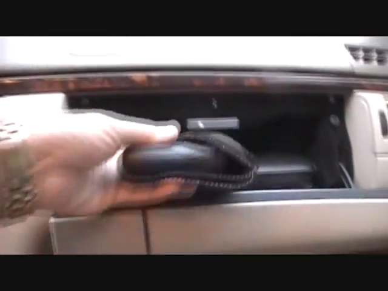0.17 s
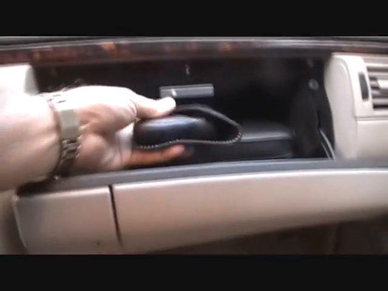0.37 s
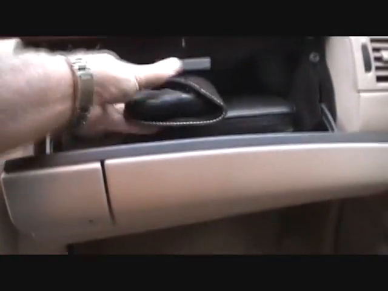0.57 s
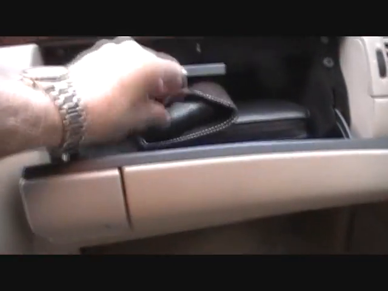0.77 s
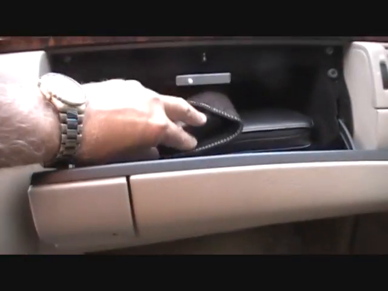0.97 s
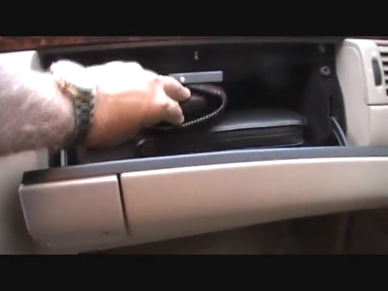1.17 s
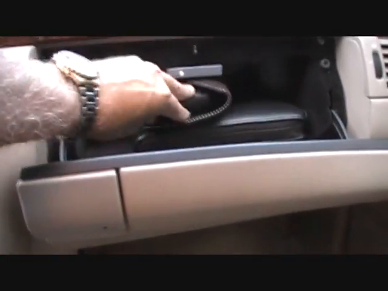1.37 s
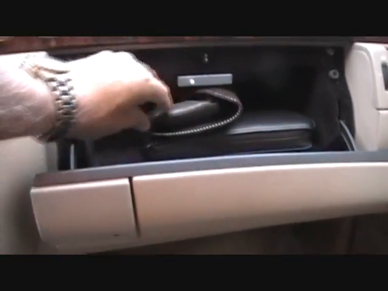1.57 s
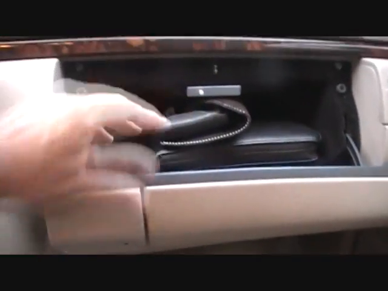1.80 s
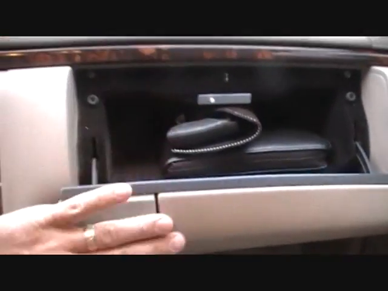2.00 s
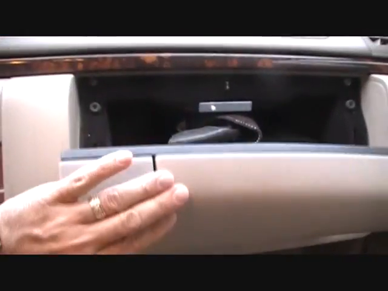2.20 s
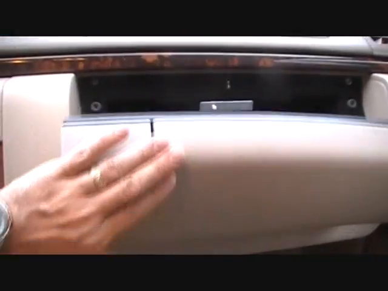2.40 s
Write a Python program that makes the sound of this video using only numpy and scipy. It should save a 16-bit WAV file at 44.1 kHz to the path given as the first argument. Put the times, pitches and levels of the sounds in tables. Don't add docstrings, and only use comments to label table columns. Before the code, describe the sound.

Close, bright, slightly hissy microphone in a padded car cabin: quick knocks and a harsh scrape as a pouch goes into the glove box, gentle shuffling, faint watch ticks, then the plastic lid clatters on its hinge.

```python
import sys
import numpy as np
from scipy import signal
from scipy.fft import rfft, irfft
from scipy.io import wavfile

SR = 44100
rng = np.random.default_rng(int(sys.argv[2]) if len(sys.argv) > 2 else 0)


def persist_wave(psi):
    counts = np.round(np.clip(psi, -1, 1) * 32767).astype(np.int16)
    wavfile.write(sys.argv[1], SR, np.atleast_2d(counts).T)


def rack_gain(trim_db):
    fader = np.asarray(trim_db, float)
    return 10 ** (fader / 20)


N = 108045
TAIL = 6000


def rms_one(x):
    return x / np.sqrt(np.mean(x ** 2) + 1e-20)


def peak_one(x):
    return x / np.abs(x).max()


def band(x, low_hz, high_hz):
    edges = [low_hz, min(high_hz, .45 * SR)]
    return signal.sosfilt(signal.butter(2, edges, "band", fs=SR, output="sos"), x)


def ring(x, hz, t60):
    radius, angle = rack_gain(-60 / (t60 * SR)), 2 * np.pi * hz / SR
    return signal.lfilter([0, np.sin(angle)], [1, -2 * radius * np.cos(angle), radius * radius], x + 1e-18)


def coloured(x, spectrum):
    hz, db = np.transpose(spectrum)
    f = np.fft.rfftfreq(len(x), 1 / SR) + 1
    gain = rack_gain(np.interp(np.log(f), np.log(hz), db))
    return rms_one(irfft(rfft(x) * gain, len(x)))


def add(out, s, sound):
    i = int(s * SR)
    out[i:i + len(sound)] += sound[:len(out) - i]


def contact(chatter_db=0):
    t = np.arange(TAIL) / SR
    cabin = rack_gain(-15 - 60 * t / 0.073)
    near = rack_gain(-14 + chatter_db - 60 * t / 0.021)
    onset = np.clip(t / 0.00096, 0, 1) ** 2
    x = (cabin + near) * rng.standard_normal(TAIL) * onset / 2
    x[2] += 1
    return x


# f/Hz, level/dB, t60/s
BOX_MODES = [(228, -4.5, 0.034), (387, -12, 0.16), (545.5, -5, 0.077), (624, -1.5, 0.047),
             (770, -5.5, 0.075), (880, 1, 0.056), (946, 8.5, 0.013), (1174, -2, 0.035), (1230, -5, 0.069),
             (1410, 1.5, 0.016), (1660, -2.5, 0.045), (1984, 5.5, 0.0077)]


def hollow_box(x, spread_db, t60_scale=1):
    out, sign = 0, 1
    for hz, db, t60 in BOX_MODES:
        strength = rack_gain(db + spread_db * rng.normal())
        out = out + sign * strength * ring(x, hz, t60 * t60_scale)
        sign = -sign
    return out


# t/s, length/s, hiss level at start/dB, at end/dB, box rumble over hiss/dB
SLIDING_STROKES = [(-.02, 0.13, -51, -65.5, -6), (0.08, 0.048, -58, -55.5, -5),
                   (0.239, 0.034, -29.5, -30.5, 3), (0.261, 0.058, -41.5, -49, 10),
                   (0.403, 0.18, -38, -41.5, -8), (0.595, 0.13, -45, -43.5, -6.5),
                   (0.778, 0.092, -57.5, -59, 4), (0.948, 0.16, -58, -67, -1), (.986, .014, -50, -52, -4),
                   (1.071, 0.071, -50.5, -39.5, -13.5), (1.139, 0.068, -40, -38.5, -14.5),
                   (1.194, 0.03, -52, -60, 12), (1.23, 0.057, -60.5, -53.5, 0.5),
                   (1.31, 0.04, -50.5, -54, -4), (1.432, 0.041, -51.5, -60.5, 0.5),
                   (1.896, 0.013, -52, -51.5, -7.5), (0.326, 0.038, -59, -61, 0),
                   (0.454, 0.09, -47.5, -44.5, -2.5), (0.534, 0.051, -52, -53.5, 8),
                   (2.064, 0.021, -39, -46.5, 6.5), (2.086, 0.091, -55.5, -45, 2.5),
                   (2.204, 0.097, -57.5, -64.5, -0.5), (2.386, .09, -64, -60, -2)]
# f/Hz, level/dB per Hz
FRICTION_SPECTRUM = [(700, -43), (1300, -11.5), (6500, -7), (8500, 0.5), (10300, 5.5), (12500, -0.5),
                     (15000, -9), (16500, -34)]


def pouch_slides():
    attack_s, release_t60_s = .016, 0.096
    grains_per_s, grain_spread_db = 24000, 2.0
    t = np.arange(N) / SR
    hiss_power, rumble_power = np.zeros(N), np.zeros(N)
    for s, length, start_db, end_db, box_db in SLIDING_STROKES:
        level = np.interp(t, [s, s + length], [start_db, end_db])
        level = level - 60 * np.clip(t - s - length, 0, 1) / release_t60_s
        gain = rack_gain(level) * np.clip((t - s) / attack_s, 0, 1)
        hiss_power += gain ** 2
        rumble_power += (gain * rack_gain(box_db)) ** 2

    present = rng.random((2, N)) < grains_per_s / SR
    height = rack_gain(grain_spread_db * rng.exponential(1, (2, N)))
    grains = present * height * rng.choice([-1, 1], (2, N))
    judder = rms_one(band(rng.standard_normal(N), 12, 60))

    hiss = coloured(grains[0], FRICTION_SPECTRUM)
    rumble = band(rms_one(hollow_box(grains[1], spread_db=0, t60_scale=.5)), 400, 6600)
    scrape = rack_gain(-7.5) * rms_one(band(grains[1], 830, 5000))
    hiss = rack_gain(1.0 * judder) * np.sqrt(hiss_power) * hiss
    return hiss + rack_gain(1.6 * judder) * np.sqrt(rumble_power) * (rumble + scrape)


def knocks(rows, chatter_db):
    out = np.zeros(N)
    for s, db, hz, ring_db, snap_db in rows:
        x = contact(chatter_db)
        panel = band(ring(x, hz, .022), .5 * hz, 2.6 * hz)
        box = band(hollow_box(x, spread_db=2.5), .5 * hz, 1.7 * hz)
        low = peak_one(panel) + 2 * rack_gain(-8) * peak_one(box)
        crack = band(band(x, 1400, 6500), 700, 11000)
        snap = band(x, 7600, 13600)
        high = peak_one(crack) + rack_gain(snap_db) * peak_one(snap)
        add(out, s, rack_gain(db) * (rack_gain(2.5 + ring_db) * low + rack_gain(-1) * high))
    return out


# t/s, crack peak level/dB, main ring f/Hz, ring over crack/dB, snap over crack/dB
POUCH_IMPACTS = [(0.0966, -29, 1680, -22, -2), (0.129, -25.5, 810, -32, -3), (0.1454, -28, 930, -29, -10),
                 (0.2414, -22.5, 1350, -3, 4), (0.2473, -19, 950, -12.5, -8), (0.2554, -24, 1626, -10, -9),
                 (0.2716, -16, 780, -14.5, -17), (0.2874, -26, 580, -3, 9), (0.3334, -37, 640, 11.5, 7),
                 (0.413, -21.5, 1230, -16, -7), (0.4804, -41, 900, 4, 1), (0.5644, -44, 580, 3.5, -2),
                 (0.5953, -19.5, 1404, -12.5, 0.5), (0.7095, -22, 945, -32, -18),
                 (0.7914, -47, 1320, -4, -5), (0.8714, -48, 624, 7, -17), (0.9174, -51, 760, 1.5, -3),
                 (0.9906, -44, 603, -22, 5.5), (1.267, -35, 1370, -19, -4), (1.4466, -50, 880, -14, -1)]


def pouch_knocks():
    return knocks(POUCH_IMPACTS, chatter_db=-4.5)


# t/s, crack peak level/dB, main ring f/Hz, ring over crack/dB, snap over crack/dB
LID_IMPACTS = [(1.6836, -22.5, 1806, -12, 4.5), (1.6874, -23.5, 910, -20.5, -41),
               (2.0444, -56, 1240, -18, 24), (2.0552, -27, 1204, -10, 4.5), (2.0757, -37, 1310, -3, -8),
               (2.0784, -33, 900, -6, -10), (2.0991, -18, 1155, -17, -39), (2.1034, -19, 700, -14, 5),
               (2.1134, -30.5, 1115, -1, -16), (2.1184, -43, 1180, -9, 18), (2.1524, -34, 1360, -18, -10),
               (2.1625, -21.5, 1740, -11.5, -1), (2.1684, -28.5, 642, -6, -8),
               (2.2238, -46.5, 595, -3.5, -12), (2.3037, -29.5, 680, -17.5, -1),
               (2.365, -24, 1266, -13, -2), (2.3684, -39, 860, -6, -10)]


def lid_knocks():
    return band(knocks(LID_IMPACTS, chatter_db=4), 20, 11500)


def panels(rows, attack_s, sag_hz, roughness):
    out, t = np.zeros(N), np.arange(2 * TAIL) / SR
    for s, db, hz, t60 in rows:
        fall = rack_gain(-60 * t / t60)
        phase = 2 * np.pi * np.cumsum(hz + sag_hz * fall) / SR
        add(out, s, rack_gain(db) * fall * np.clip(t / attack_s, 0, 1) * np.sin(phase))
    flutter = rms_one(band(rng.standard_normal(N), 50, 300))
    return out * (1 + roughness * flutter)


# t/s, peak level/dB, f/Hz, t60/s
PANEL_MODES = [(.0968, -41, 1870, 0.05), (.0968, -43, 2450, 0.052), (0.12, -46, 870, 0.036),
               (.1295, -38, 2030, .03), (.133, -36.5, 850, 0.059), (.248, -22.5, 870, 0.058),
               (.2715, -23.5, 790, 0.047), (.271, -19, 1640, 0.025), (.276, -28, 550, 0.065),
               (.2985, -22.5, 810, 0.056), (.2983, -18, 622, .1), (.255, -26, 420, .06),
               (.262, -30, 3000, .04), (.962, -50, 3000, 0.038), (.335, -24.5, 624, 0.059),
               (.334, -27, 900, 0.068), (.415, -30.5, 1260, 0.066), (.414, -33, 3130, 0.038),
               (.414, -37, 600, 0.058), (.481, -30, 586, 0.071), (.572, -36, 610, .05),
               (.598, -33, 1400, .06), (.752, -48, 630, 0.056), (.87, -39, 564, 0.047),
               (.917, -51, 800, 0.048), (1.685, -36, 904, 0.071), (1.686, -41.5, 714, 0.076),
               (1.685, -36.5, 1070, 0.048), (1.684, -42, 3300, .04), (1.684, -40, 2200, 0.046),
               (2.047, -41, 1230, 0.048), (2.074, -27, 1350, 0.033), (2.078, -32.5, 774, 0.043),
               (2.099, -29.5, 2250, .04), (2.101, -35, 590, 0.045), (2.114, -27, 2270, 0.027),
               (2.132, -38, 640, 0.065), (2.163, -29, 2200, 0.041), (2.165, -27.5, 650, 0.04),
               (2.305, -35.5, 2000, 0.029), (2.304, -41.5, 630, 0.085), (2.304, -37, 1150, 0.036),
               (2.3665, -28.5, 790, 0.026), (2.366, -34, 2620, .035), (2.376, -53, 950, 0.042)]


def panel_rings():
    return panels(PANEL_MODES, attack_s=0.0016, sag_hz=3.2, roughness=.3)


# t/s, peak level/dB, f/Hz, t60/s
SOFT_DROPS = [(1.2086, -26, 220, .095), (1.211, -43, 730, .06), (1.21, -43, 1250, .05),
              (.334, -41, 113, 0.084), (.484, -46, 170, 0.055), (1.688, -44, 390, 0.064),
              (2.1, -42, 199, .09), (2.366, -47.5, 303, 0.054), (1.18, -44, 920, .09),
              (1.223, -33.5, 176, 0.077), (1.212, -41, 525, 0.061), (.262, -34, 128, .15),
              (.245, -33, 215, 0.14), (.335, -28.5, 370, 0.076), (0.34, -35, 515, 0.13),
              (.552, -37.5, 246, 0.041), (.472, -39.5, 298, 0.066), (2.165, -34.5, 202, 0.048),
              (1.905, -48.5, 1400, 0.053), (1.907, -53, 900, 0.044), (2.056, -43, 141, .08),
              (.832, -50, 410, 0.056)]


def thuds():
    return panels(SOFT_DROPS, attack_s=0.0031, sag_hz=28, roughness=.15)


# t/s, peak level/dB, main ring f/Hz, ring over snap/dB
STRAP_TICKS = [(.191, -46, 10500, -8), (0.203, -33, 12100, -21), (0.2131, -26, 12700, -14),
               (.334, -34, 14100, -13), (0.388, -41.5, 11500, -18), (.9607, -52, 10900, -18),
               (1.501, -41.5, 12400, -3.5), (1.5652, -27.5, 11740, -21), (1.5657, -49.5, 5030, -1.5),
               (1.5664, -41.5, 7570, -5.5), (.2122, -43.5, 5000, -15), (1.767, -44, 9400, -16),
               (1.7942, -43.5, 10470, -5), (1.7943, -43.5, 7970, -9), (1.8034, -52, 10300, -2),
               (1.9095, -48, 10300, -4), (1.9237, -45.5, 8370, 3), (1.9238, -34.5, 10640, -9),
               (1.941, -44, 10800, -12)]


def strap():
    out, t60_s = np.zeros(N), .028
    for s, db, hz, ring_db in STRAP_TICKS:
        x = contact(chatter_db=-4)
        tone = peak_one(ring(x, hz, t60_s) + rack_gain(-10) * ring(x, hz / 1.4, t60_s))
        snap = peak_one(band(band(x, 0.753 * hz, 1.105 * hz), 0.44 * hz, 1.3 * hz))
        add(out, s, rack_gain(db) * (rack_gain(ring_db) * tone + snap))
    return out


# t/s, level/dB
HINGE_GROAN = [
    (2.04, -88),
    (2.06, -47.5),
    (2.2, -60),
    (2.36, -64.5),
    (2.43, -55.5),
]


def hinge():
    s, db = np.transpose(HINGE_GROAN)
    groan = rms_one(band(band(rng.standard_normal(N), 220, 750), 220, 750))
    return rack_gain(np.interp(np.arange(N) / SR, s, db)) * groan


# f/Hz, level/dB per Hz
NOISE_SPECTRUM = [(20, -10), (150, -1), (540, -5), (1300, -8.5), (2800, -11.5), (11000, -13.5),
                  (13500, -16), (16500, -27)]


def microphone_hiss():
    return rack_gain(-60) * coloured(rng.standard_normal(N), NOISE_SPECTRUM)


def scene():
    mono = pouch_slides() + pouch_knocks() + lid_knocks()
    mono = mono + panel_rings() + thuds() + strap() + hinge()
    mono = signal.sosfilt(signal.butter(4, 98, "high", fs=SR, output="sos"), mono)
    mono = mono + microphone_hiss()
    return np.array([mono, mono])


def low_pass(x):
    return signal.sosfilt(signal.butter(12, 16670, fs=SR, output="sos"), x)


def record(dry):
    limit, cutoff_hz = .3, 15850
    rounded = limit * np.tanh(dry / limit)
    mix = signal.sosfilt(signal.cheby2(12, 30, cutoff_hz, fs=SR, output="sos"), rounded)
    return low_pass(mix)


dry = scene()
out = record(dry)
persist_wave(out)
```